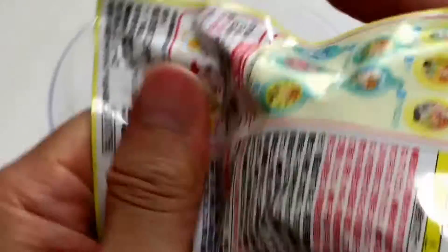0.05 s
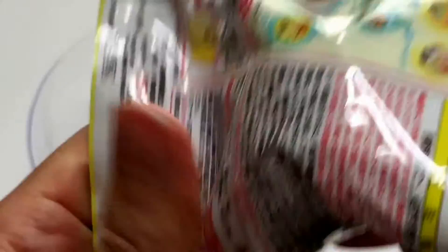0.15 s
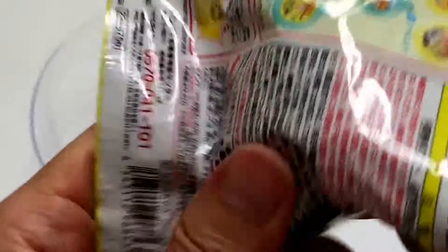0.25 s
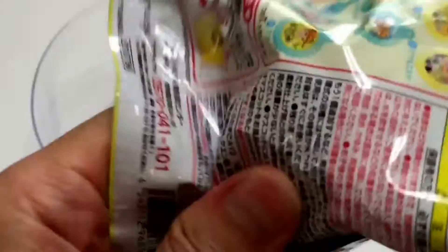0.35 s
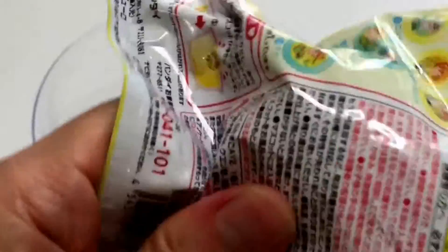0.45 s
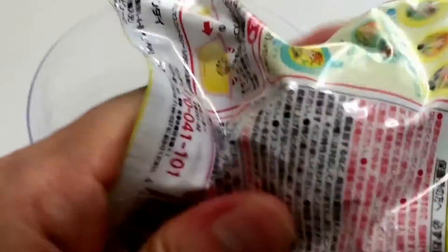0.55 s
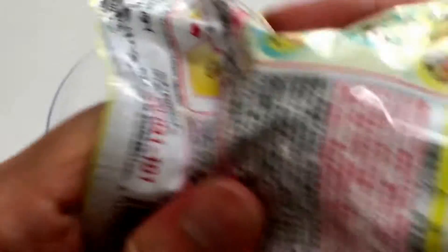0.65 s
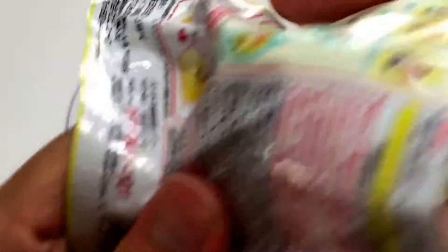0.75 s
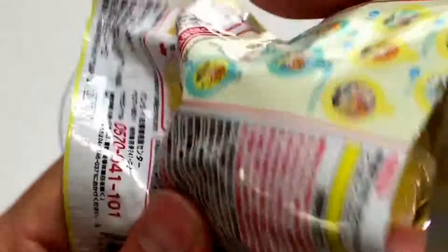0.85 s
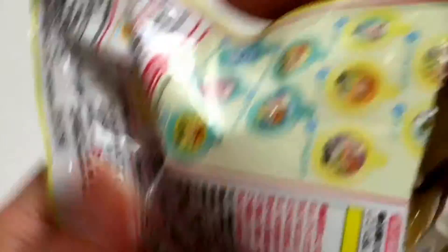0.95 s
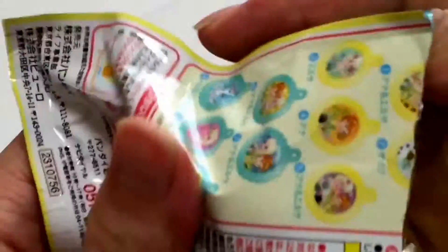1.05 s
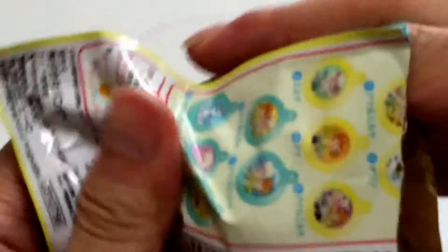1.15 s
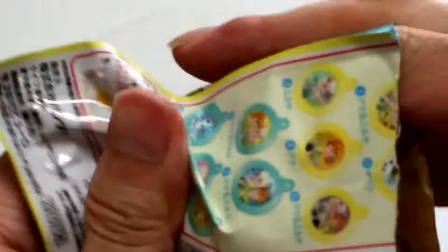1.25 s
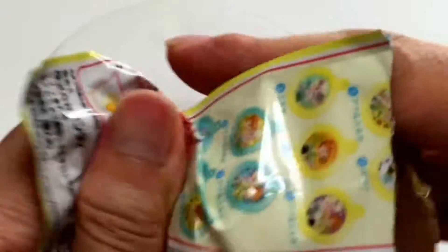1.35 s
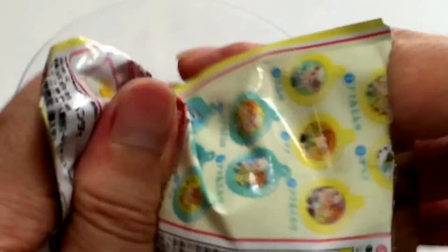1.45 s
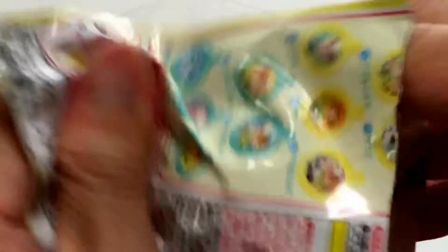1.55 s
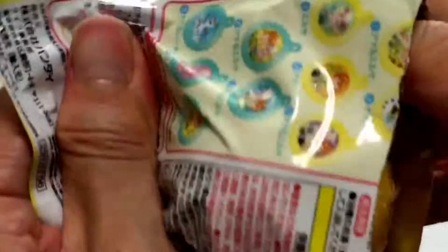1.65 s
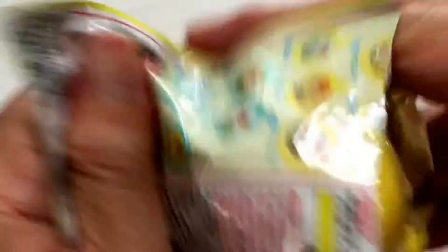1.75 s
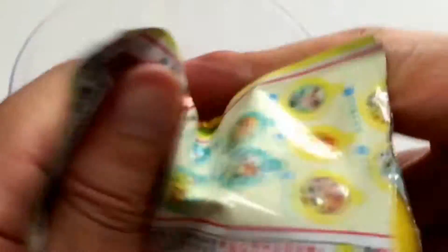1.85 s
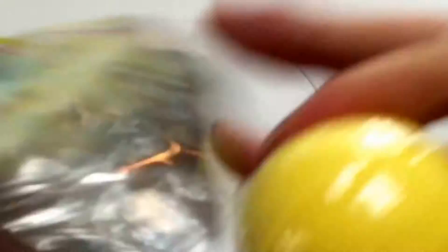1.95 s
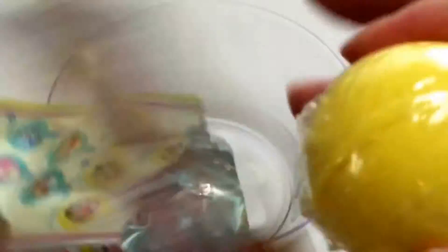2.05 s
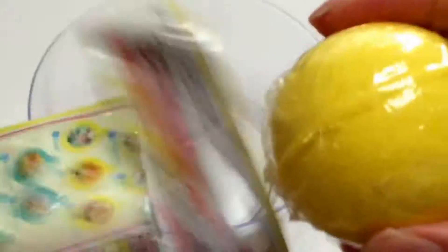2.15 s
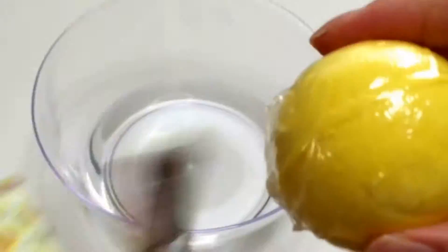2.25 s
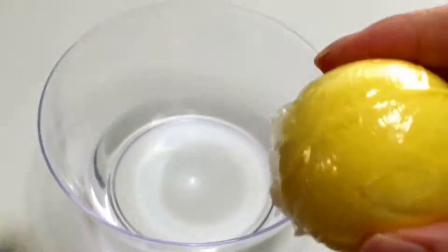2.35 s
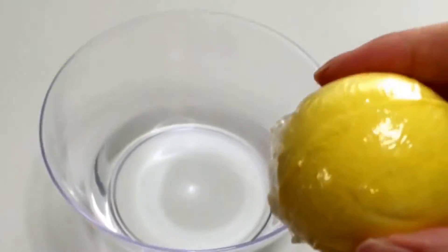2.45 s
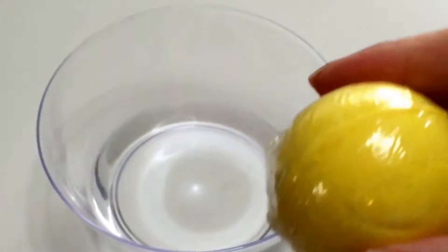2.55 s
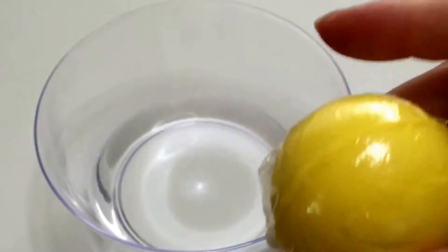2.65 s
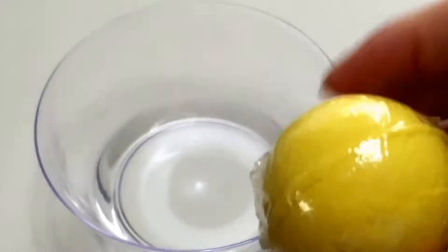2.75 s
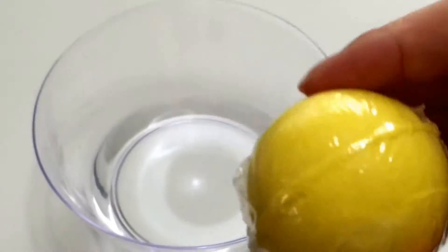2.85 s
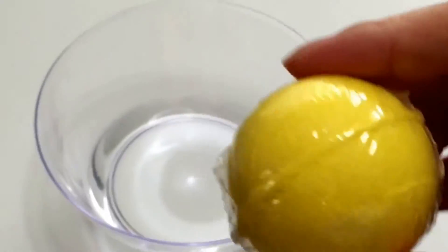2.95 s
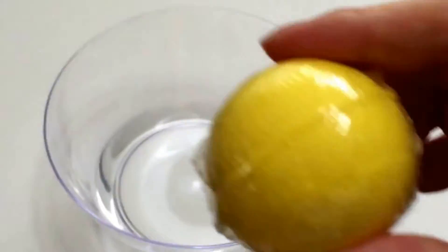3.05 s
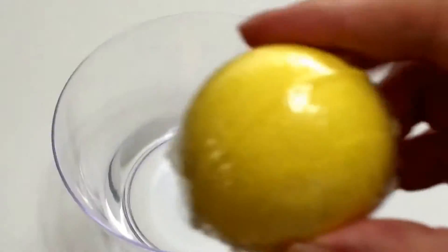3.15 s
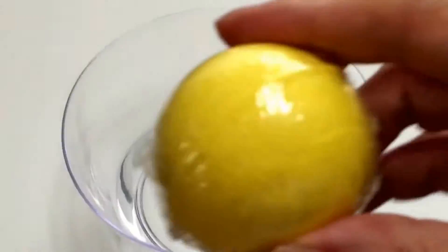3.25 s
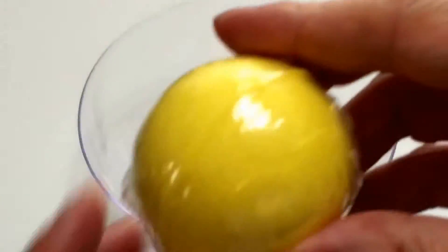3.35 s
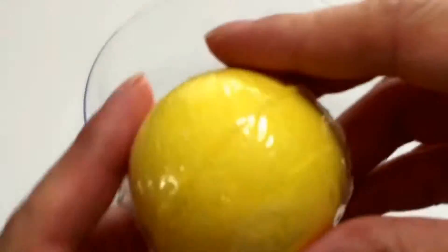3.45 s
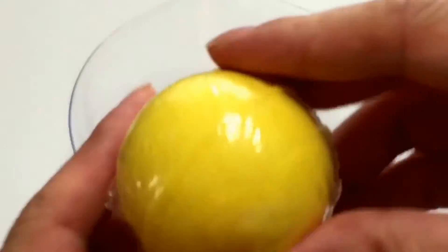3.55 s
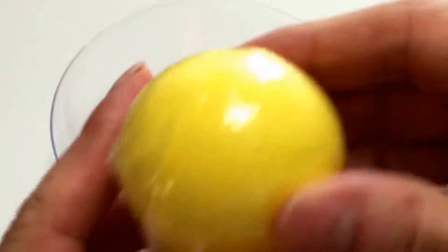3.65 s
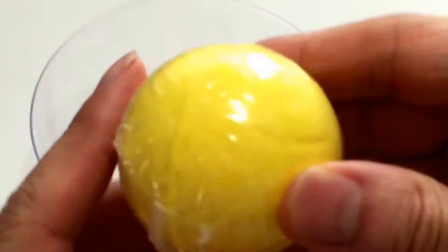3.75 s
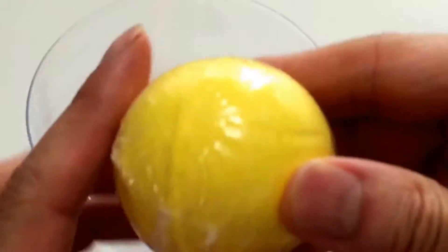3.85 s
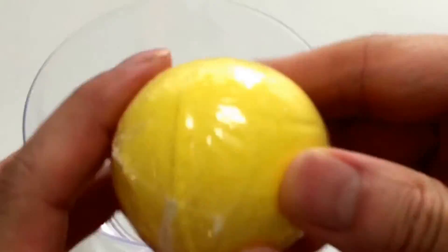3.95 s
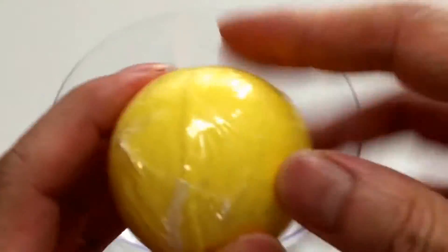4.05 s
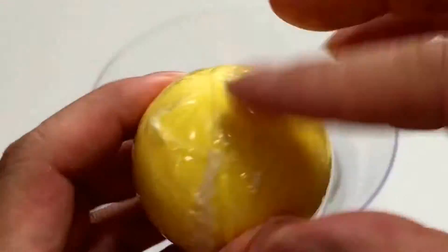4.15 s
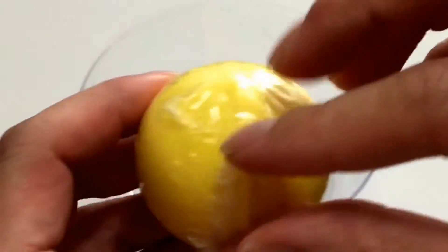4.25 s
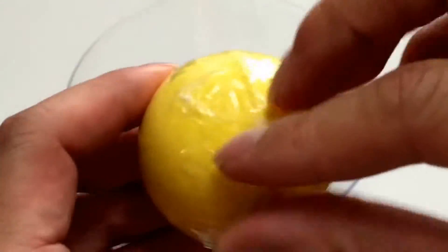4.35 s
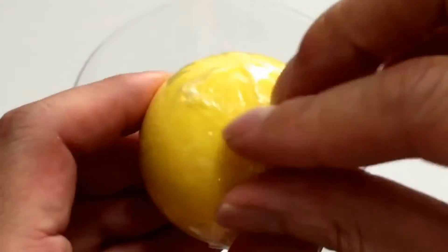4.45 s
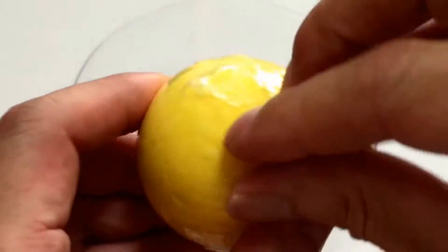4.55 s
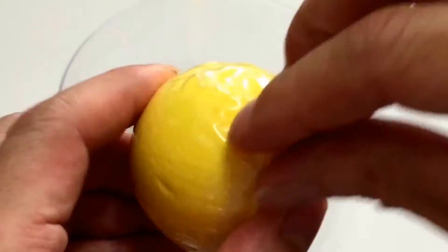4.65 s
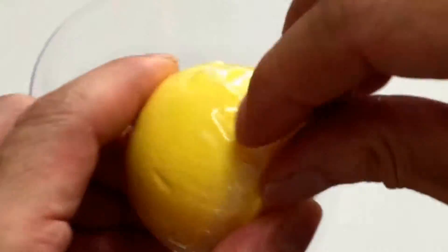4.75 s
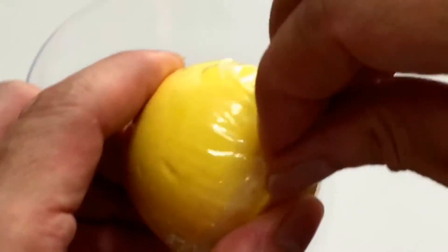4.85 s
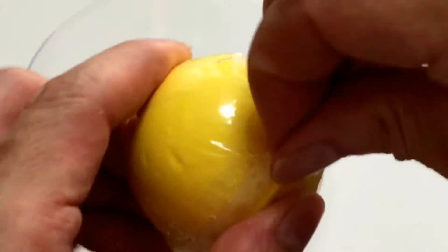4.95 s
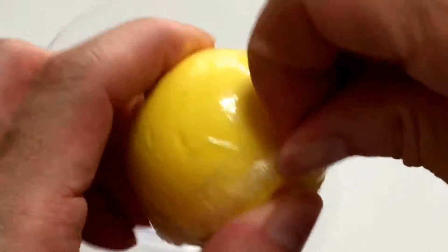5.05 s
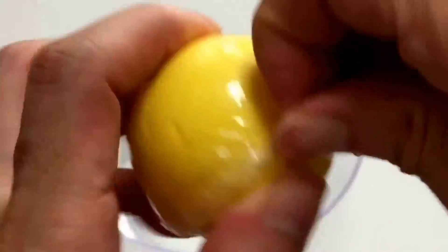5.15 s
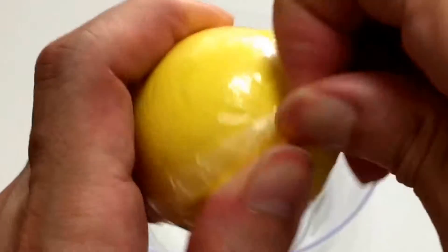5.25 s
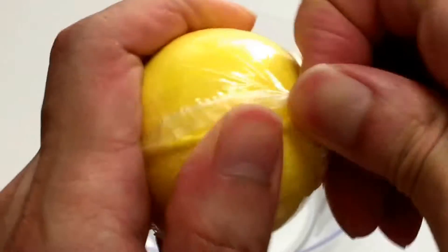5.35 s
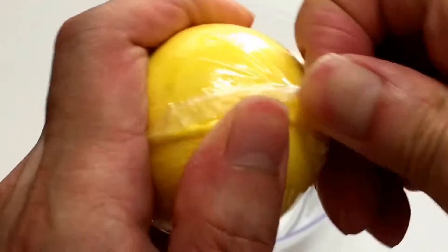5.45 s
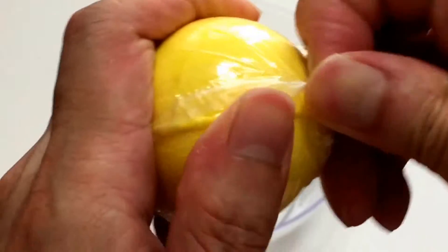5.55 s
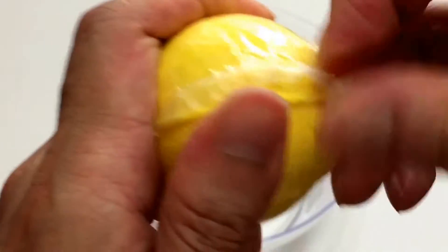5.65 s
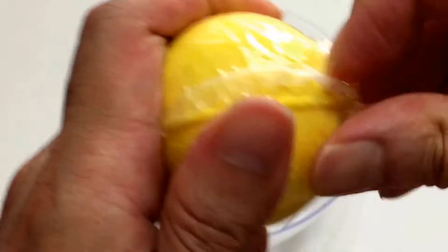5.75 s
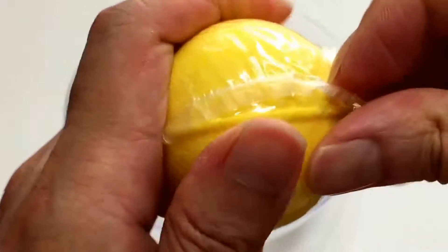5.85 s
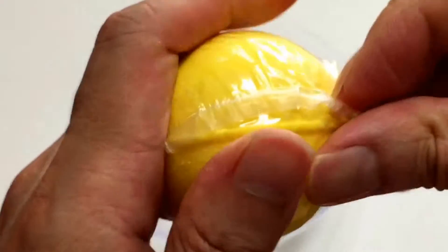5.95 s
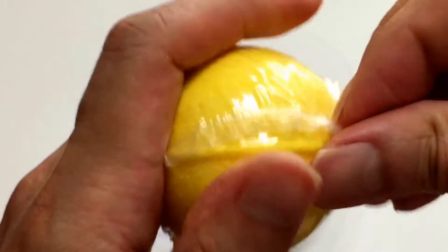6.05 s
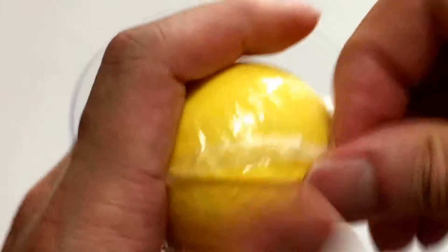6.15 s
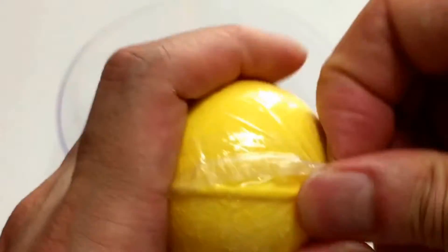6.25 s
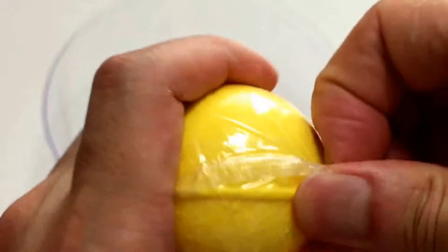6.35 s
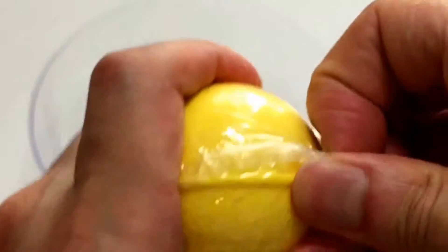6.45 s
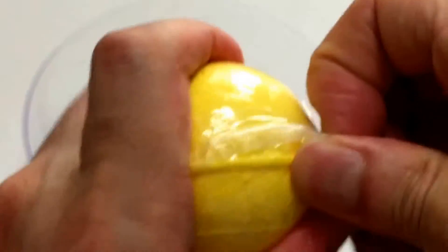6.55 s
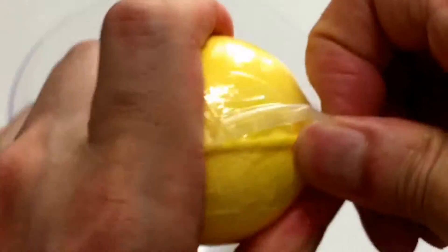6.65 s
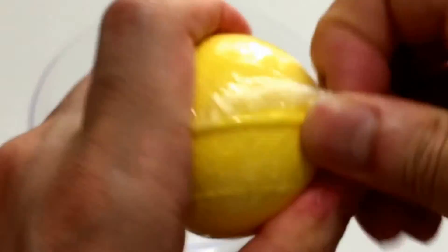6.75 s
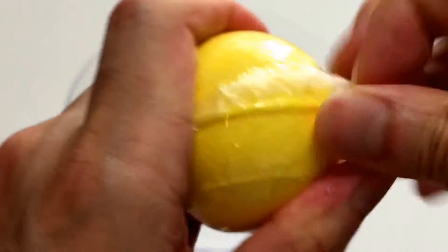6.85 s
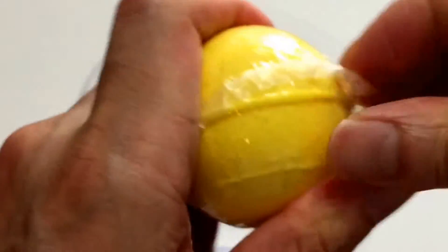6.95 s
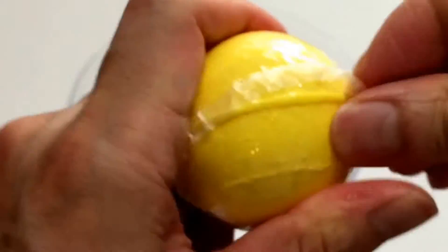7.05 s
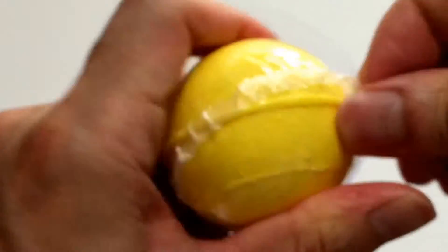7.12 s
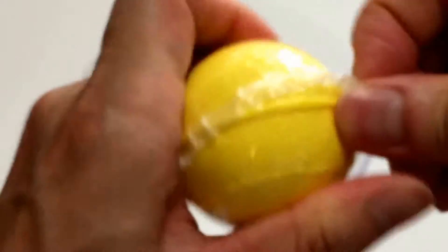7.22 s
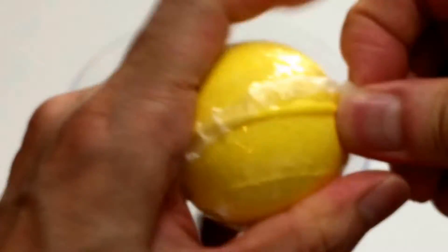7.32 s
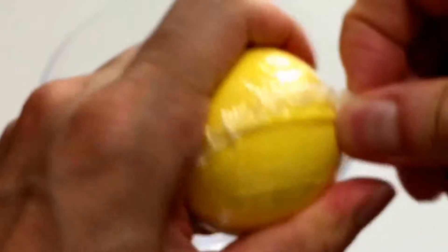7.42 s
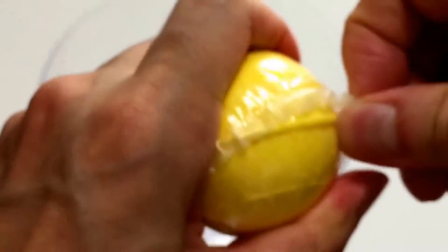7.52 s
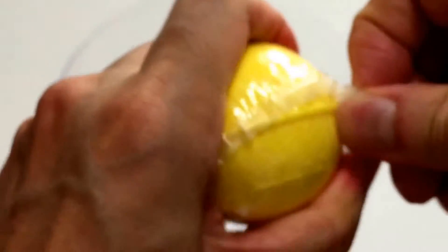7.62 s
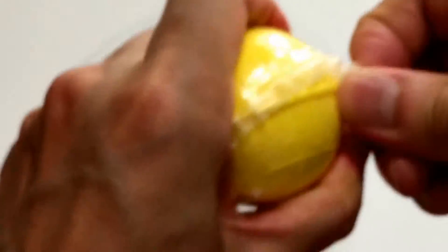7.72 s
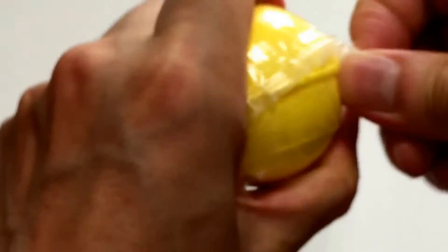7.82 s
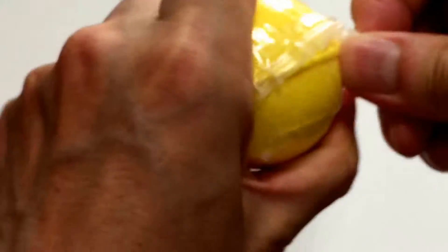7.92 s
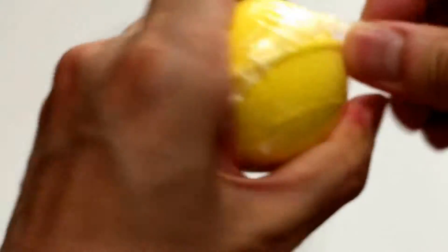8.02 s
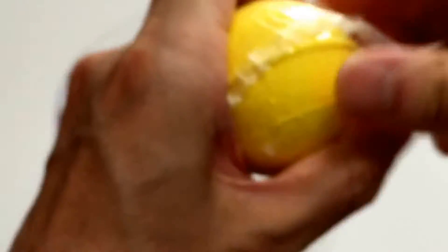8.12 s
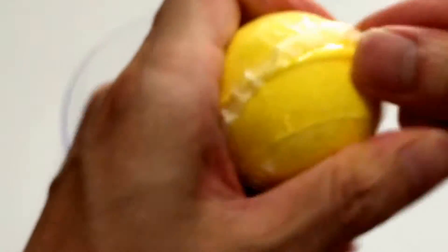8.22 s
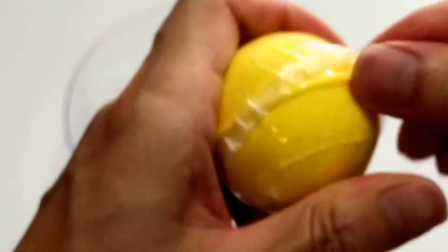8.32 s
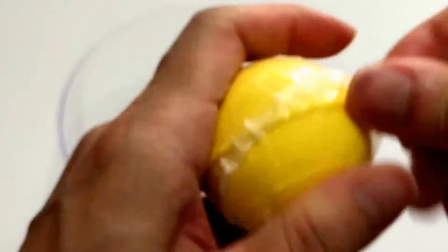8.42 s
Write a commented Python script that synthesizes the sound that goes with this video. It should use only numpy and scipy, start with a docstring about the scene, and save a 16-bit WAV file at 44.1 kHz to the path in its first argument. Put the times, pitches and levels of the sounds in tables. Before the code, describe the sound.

From the very start a stiff foil bag crackles close to the microphone: hard, dry, bright snaps, many per second, over fine crinkling and sliding film. Squeezes come in uneven bursts, with slightly more spaced snaps around 1.0 to 1.3 seconds, then a strong build, loudest from 1.6 to 2.0 as the bag is pulled off a ball, with a few dull soft bumps. Rustling thins after 2.3 and nearly stops by 2.7. Until 4.3 there is mostly steady airy hiss and a deep wavering hum, with a small tick near 3.3 and a clearer one near 3.7. Crisp ticks at 4.6 and 4.9 begin gentle picking at thin film. Light crinkles and fizzy little clicks grow busier from 6.3 to 7.1, then stay sparse and delicate to 8.5, while a somewhat higher low hum swells around 7.4. Short small-room reflections.

```python
"""Unwrapping a toy ball

Hands pull a toy ball out of a stiff foil bag, then pick more gently at the thin shrink film round the ball.
Creases buckle in single snaps, each ringing a small facet of the sheet, made from short damped swings.
Under them lie finer crinkles and sliding film, made from random clicks and noise in narrow bands.
All is close to the microphone in a small room, with a wavering hum of sine tones and a steady noise hiss."""
import sys
import numpy as np
from scipy import signal
from scipy.fft import rfft, irfft
from scipy.io import wavfile
from scipy.ndimage import uniform_filter1d

SR = 44100
rng = np.random.default_rng(int(sys.argv[2]) if len(sys.argv) > 2 else 0)


def file_out(sig):
    """Save sig as 16-bit WAV at sys.argv[1]."""
    # one column per channel
    cols = np.atleast_2d(sig).T
    # limit, then scale
    lim = np.clip(cols, -1, 1)
    pcm = np.round(lim * 32767).astype(np.int16)
    wavfile.write(sys.argv[1], SR, pcm)


N = 373968
CUTOFF_HZ = 15450   # top of the microphone's range, and the highest pitch of a facet or crack


def from_db(db):
    """Turn decibels into a gain."""
    return 10 ** (np.asarray(db) / 20)


def rms_one(x):
    """Scale a sound to an rms of 1."""
    return x / np.sqrt(np.mean(x ** 2) + 1e-20)


def in_time(rows):
    """Draw straight lines between the rows of a table, giving each column a value at every sample."""
    s, *columns = np.transpose(rows)
    return [np.interp(np.arange(N) / SR, s, column) for column in columns]


def at_hz(points, hz):
    """Read a spectrum in dB between its points, on a log-frequency axis."""
    point_hz, db = np.transpose(points)
    return np.interp(np.log(hz), np.log(point_hz), db)


def band(x, low_hz, high_hz, order=2):
    """Keep only the frequencies between two limits (Butterworth band-pass)."""
    edges_hz = [low_hz, min(high_hz, .47 * SR)]
    sos = signal.butter(order, edges_hz, "band", fs=SR, output="sos")
    return signal.sosfilt(sos, x)


def add(out, s, sound):
    """Mix a sound in at a time in seconds."""
    at = max(round(s * SR), 0)
    out[at:at + len(sound)] += sound[:max(N - at, 0)]


def twitch(hz, cycles):
    """A heavily damped swing: its envelope peaks after so many cycles, and it draws back the air it pushes."""
    # age is 1 where the envelope peaks
    age = np.arange(int(10 * cycles * SR / hz) + 2) * hz / (SR * cycles)
    turn = 2 * np.pi * cycles
    envelope = age * np.exp(1 - age)
    # this starting phase makes push and pull cancel
    return envelope * np.sin(turn * age - 2 * np.arctan(turn))


def tail(t60, delay_s, low_hz, high_hz):
    """Dense reflections of unit energy: noise that falls by 60 dB in t60 seconds, after a delay."""
    t = np.arange(int(t60 * SR) + 2) / SR
    dying = rng.standard_normal(len(t)) * from_db(-60 * t / t60)
    echoes = band(dying, low_hz, high_hz)
    return np.r_[np.zeros(int(delay_s * SR)), echoes / np.linalg.norm(echoes)]


def background(rms_db=-47.5, ripple_db=4.0, ripple_hz=50):
    """Steady air noise and hiss with narrow drones and whines; standing waves of the room ripple its spectrum."""
    # spectrum of the noise, relative: [f/Hz, level/dB per Hz]
    noise_colour = [(22, -36), (30, -5), (45, -12.5), (68, -8), (100, -1), (170, -4), (280, -12),
                    (500, -24), (850, -18), (1200, -16), (2200, -19), (3400, -26.5), (7000, -27),
                    (8600, -20.5), (10500, -42.5), (15000, -40)]
    # narrow drones and whines, and a dip where the rise is negative: [f/Hz, width/Hz, rise/dB]
    whines = [(44.6, 4, 17), (98.9, 6.1, 9), (2330, 11, 6), (4640, 30, -6), (5193, 25, 1), (5600, 18, 10)]
    hz = np.maximum(np.arange(N // 2 + 1) * SR / N, 1)
    knots_hz = np.arange(0, SR / 2, ripple_hz)
    ripple = ripple_db * np.interp(hz, knots_hz, rng.standard_normal(len(knots_hz)))
    db = at_hz(noise_colour, hz) + ripple * np.minimum(hz / 700, 1)   # weaker ripple in the bass
    for centre_hz, width_hz, rise_db in whines:
        db += rise_db / (1 + (2 * (hz - centre_hz) / width_hz) ** 2)
    noise = irfft(rfft(rng.standard_normal(N)) * from_db(db), N)
    return from_db(rms_db) * rms_one(noise)


def hum(deep_hz=56.1, upper_hz=148.4, waver=0.0032):
    """A deep tone with its octave fades while a higher tone swells; all waver in pitch together."""
    # rms levels of the tones: [t/s, deep level/dB, octave level/dB, upper level/dB]
    hum_levels = [(0.1, -59, -66, -60), (0.8, -56, -68, -64), (0.96, -49, -49.5, -64),
                  (1.82, -52.5, -59, -76), (2.12, -47, -48, -56), (2.53, -58, -59, -74),
                  (2.94, -48.5, -45.5, -66), (3.43, -54.5, -58, -56.5), (5.84, -73, -74, -48.5),
                  (7.41, -68, -70, -44.5), (8.25, -71, -75, -50.5)]
    wander = rms_one(uniform_filter1d(rng.standard_normal(N), size=8000))
    turn = 2 * np.pi * np.cumsum(1 + waver * wander) / SR   # phase of a 1 Hz tone
    pitches = [deep_hz, 2 * deep_hz, upper_hz]
    tones = [from_db(db) * np.sin(hz * turn) for hz, db in zip(pitches, in_time(hum_levels))]
    return np.sqrt(2) * sum(tones)


def rustle(attack_s=0.011, release_s=0.011, rest_flap_db=-0.5, rest_fizz_db=-15):
    """Levels of flapping, crinkle and fizz in dB: steady handling, and squeezes that build up, hold and relax."""
    # how hard the hands work the film between squeezes, first the bag, then the ball:
    # [t/s, crinkle level/dB]
    handling = [(0, -45), (.28, -45.5), (.52, -44), (.85, -45), (1.3, -46), (1.9, -43.5), (2.3, -47),
                (2.7, -56), (4.1, -67), (5.4, -60.5), (6.4, -53.5), (7.3, -56), (8.48, -54.5)]
    # squeezes and pulls, flap and fizz relative to the crinkle:
    # [start of hold t/s, hold/s, crinkle level/dB, flap level/dB, fizz level/dB]
    squeezes = [(0.053, .02, -31.5, -5, -27), (.125, 0.026, -41, -13, -3), (0.33, 0.025, -35.5, -19, -6),
                (0.418, 0.088, -36.5, -25, -14), (0.586, .03, -32, -15, -10), (0.673, 0.039, -35, -7, -8),
                (0.939, 0.11, -38.5, -3.5, -7), (1.143, 0.075, -41, -0.5, -15),
                (1.361, 0.032, -31, -8.5, -9), (1.205, .03, -44.5, 5, -14), (1.47, .04, -35, -21, -13),
                (1.606, 0.038, -35.5, -20, -8), (1.777, 0.032, -27.5, -13, -10),
                (1.804, 0.064, -30, -9.5, -7), (1.958, 0.044, -27, -7, -9), (2.004, 0.025, -32, 2.5, -5),
                (2.16, 0.043, -44, -4, -8), (2.221, 0.044, -33, -10.5, -8.5),
                (2.269, 0.036, -42.5, -10, -12), (2.425, 0.059, -49.5, -13, -4),
                (2.62, 0.047, -57.5, 6.5, -2), (4.319, 0.069, -56.5, -11, -10), (4.664, .07, -52, -22, -8),
                (5.385, .04, -56.5, -8, -1), (5.691, .04, -54.5, -12, 4), (5.88, 0.12, -56.5, -7, -11),
                (6.316, .03, -52, 1, -6), (6.392, 0.058, -50.5, -12, 1), (6.53, 0.054, -58, -15, 5),
                (6.622, 0.077, -55, -3, -4), (6.79, 0.16, -53.5, -19, 1.5), (7.09, 0.046, -52.5, -13, 1),
                (7.348, .02, -60.5, 0, 5.5), (7.709, 0.034, -62, 3, 11.5), (7.87, 0.027, -58.5, 5, 5.5),
                (7.961, 0.09, -62, -1, 10.5), (8.061, 0.054, -53.5, 4, -1), (8.244, .04, -56, 6, 2.5)]
    t = np.arange(N) / SR
    handling_db, = in_time(handling)
    # between squeezes the sheet flaps about as loudly as it crinkles and hardly fizzes
    power = from_db(handling_db + np.array([[rest_flap_db], [0], [rest_fizz_db]])) ** 2
    for start, hold, db, flap, fizz in squeezes:
        near = slice(*np.searchsorted(t, [start - attack_s, start + hold + 10 * release_s]))
        age = t[near] - start
        build_up = np.clip(1 + age / attack_s, 0, 1)
        relaxing = np.exp(-np.maximum(age - hold, 0) / release_s)
        gains = from_db([[db + flap], [db], [db + fizz]])
        power[:, near] += (gains * build_up * relaxing) ** 2
    return 10 * np.log10(power)


def crinkles(flap_db, crinkle_db, fizz_db, per_s=1400, size_spread_db=6.0, own_db=6.5, slide_db=-7.5,
             grain_db=-1.0, grip=0.14, patchy_db=3.0, patch_s=.02, scatter_s=.0008, count=21):
    """Swarms of tiny buckles, each shared unevenly among facets of all sizes, over the hiss of sliding film."""
    # colour of the fine crinkles: [f/Hz, level/dB]
    crinkle_colour = [(180, -13.5), (300, -12.5), (560, -12), (900, -5.5), (1400, -2.5), (2200, -4.5),
                      (3500, -5), (5500, 1.5), (9000, 0.5), (14000, 1)]
    t = np.arange(N) / SR
    at = np.flatnonzero(rng.random(N) < per_s / SR)
    sizes_db = size_spread_db * np.minimum(rng.exponential(1, len(at)), 4)
    # the lighter the handling, the larger the share of sliding hiss beside the buckling clicks
    buckling = from_db(grain_db + grip * np.minimum(crinkle_db + 33, 0))
    sliding = from_db(slide_db) * rng.standard_normal((2, N))   # neighbouring bands get unrelated noise
    knots = np.arange(0, t[-1] + patch_s, patch_s)
    half_band = 2 ** (1 / 5)
    out = np.zeros(N)
    for k, hz in enumerate(np.geomspace(180, 14000, count)):
        # bending waves reach each size of facet at a slightly different moment
        scatter = (scatter_s * SR * rng.random(len(at))).astype(int)
        arrival = np.minimum(at + scatter, N - 1)
        share_db = own_db * np.clip(rng.standard_normal(len(at)), -2, 2)
        clicks = np.zeros(N)
        clicks[arrival] = from_db(sizes_db + share_db) * rng.choice([-1, 1], len(at))
        drive = buckling * rms_one(clicks) + sliding[k % 2]
        # large facets flap, middling ones crinkle, the smallest fizz
        large = np.interp(np.log(hz), np.log([650, 1600]), [1, 0])
        small = np.interp(np.log(hz), np.log([2800, 6000]), [0, 1])
        level_db = large * flap_db + small * fizz_db + (1 - large - small) * crinkle_db
        # facets come and go as the sheet changes shape
        level_db = level_db + patchy_db * np.interp(t, knots, rng.standard_normal(len(knots)))
        gain = from_db(level_db + at_hz(crinkle_colour, hz)) * np.sqrt(SR / hz)   # evens out band power
        out += gain * band(drive, hz / half_band, hz * half_band)
    return out


def creases(crinkle_db, small_hz=2900, pitch_spread=0.42, cycles=0.19, crack_db=-10, push_db=-22,
            colour_db=4.5, typical_db=-18, thinning=0.39, count=200):
    """Rows of every snap: the big ones, the neighbours they take along, and small ones that follow the handling."""
    # big creases that snap; crack of the fold and push of the whole sheet are relative to the swing:
    # [t/s, facet swing level/dB, facet f/Hz, cycles to envelope peak, crack level/dB, push level/dB]
    big_snaps = [(0.0377, -4, 2110, 0.12, -11, -26), (0.0493, -20, 2100, 0.4, -24, 6),
                 (0.064, -4.5, 2250, 0.15, -15, -40), (0.0755, -1, 2410, 0.1, -17, -40),
                 (0.1138, -4, 3400, 0.4, 3, -40), (0.1199, -3, 2100, 0.19, -6, -15),
                 (0.1771, -1.5, 3570, 0.34, -14, -21), (0.267, -7.5, 2580, 0.14, -9, -21),
                 (0.3265, 1.5, 3900, 0.25, -7, -30), (0.3344, -3, 3420, 0.38, 0, -37),
                 (0.3458, -13, 1600, 0.3, -6, -19), (0.3673, -2, 4540, 0.57, 7, -21),
                 (0.4001, -10, 5880, 0.5, -7, -31), (0.415, 3.5, 3400, 0.21, -13, -21),
                 (0.4293, -1, 3640, 0.23, -5, -19), (0.4508, 1.5, 3400, 0.19, -8, -37),
                 (0.4624, -7.5, 2250, 0.18, -26, -10), (0.494, -14, 2430, 0.2, -15, -11),
                 (0.522, -3.5, 1490, 0.13, -10.5, -25), (0.5289, -6.5, 5120, 0.33, -4, -32),
                 (0.5639, -5.5, 1690, 0.14, -24, -9), (0.5826, -1.5, 2410, 0.12, -24, -24),
                 (0.6066, -2.5, 5120, 0.22, -22, -29.5), (0.6108, -14, 2910, 0.2, 3, -20),
                 (0.6544, -14, 2100, 0.14, -6, 2), (0.6584, -10, 4260, 0.52, 3.5, -24),
                 (0.668, -3.5, 2540, 0.53, 4, -10), (0.6963, -13.5, 1300, 0.18, -10, -9),
                 (0.709, -8, 5880, 0.37, -4, -27), (0.716, -6, 2760, 0.22, -13, -29),
                 (0.7438, -12, 3900, 0.23, -13, -34), (0.7526, -13, 1300, 0.14, -24, -40),
                 (0.76, -17, 3900, 0.36, 5.5, -40), (0.8103, 3, 3400, 0.3, -7, -37),
                 (0.8178, -4, 2960, 0.09, -14, -32), (0.8497, -12.5, 2960, 0.3, -15, -26),
                 (0.8961, -16.5, 2100, 0.28, 7, -5), (0.9129, -4, 4800, 0.35, -7, -25),
                 (0.9349, -10, 3900, 0.18, -2, -22), (0.9406, -3.5, 4170, 0.16, -24, -40),
                 (0.953, 1.5, 1960, 0.12, -5.5, -16), (0.9999, -6, 3170, 0.21, -16, -40),
                 (1.1055, -9.5, 2230, 0.3, -9, -40), (1.1165, -6, 3400, 0.14, -24, -34),
                 (1.1469, -9, 2060, 0.3, -24, -40), (1.1535, -2, 2300, 0.23, -24, -9.5),
                 (1.1862, -12.5, 2250, 0.21, -7, -22), (1.224, -16, 2760, 0.23, -24, -15),
                 (1.2688, -15, 2800, 0.4, -31, -40), (1.3136, -3.5, 2580, 0.25, -10, -42),
                 (1.3539, -4, 2580, 0.19, -16, -8), (1.3648, -4.5, 1830, 0.21, 0, -38),
                 (1.3874, 0, 9100, 0.55, -24, -31), (1.4222, 0, 3620, 0.3, -10, -22),
                 (1.4363, -4, 4780, 0.3, -24, -40), (1.4716, 1, 4170, 0.13, -31, -24),
                 (1.4797, -10, 1830, 0.17, -11, -40), (1.525, 0, 3640, 0.13, -24, -30),
                 (1.5425, 3.5, 2250, 0.13, -6, -45), (1.5814, -7, 4500, 0.27, -13, -7.5),
                 (1.5987, 8, 2980, 0.12, -7, -17), (1.6138, -4, 5260, 0.55, 1, -39),
                 (1.6377, -6, 1490, 0.14, 2.5, -42), (1.6548, -8, 3400, 0.18, -27, -40),
                 (1.6745, -5.5, 1960, 0.14, -24, -44), (1.6904, -8.5, 2780, 0.32, -8, -40),
                 (1.722, -9, 3900, 0.24, -13, -27), (1.7557, -13.5, 5880, 0.43, -5, -40),
                 (1.769, -11, 6800, 0.76, 9.5, -22), (1.7789, -5.5, 1300, 0.16, -26, -6.5),
                 (1.7928, 8, 3420, 0.12, -9, -18), (1.8195, -13, 2580, 0.4, 0, 3),
                 (1.8272, -6, 3900, 0.4, -4, -40), (1.8554, 0.5, 2450, 0.19, -4, -40),
                 (1.861, -10.5, 6240, 0.69, -7, -7), (1.8854, 2, 1480, 0.13, -24, -40),
                 (1.8988, -3.5, 2410, 0.14, -0.5, -25), (1.9271, -14, 2760, 0.23, -8, -40),
                 (1.938, -1.5, 2050, 0.23, -16, -6.5), (1.9616, -2, 1960, 0.19, -10, -25),
                 (2.0108, -5, 2100, 0.14, -11, -32), (2.0322, -0.5, 4100, 0.49, -7, -30),
                 (2.078, -4, 9300, 0.65, -26, -37), (2.0865, -6.5, 3400, 0.19, -4, -40),
                 (2.101, -11, 5120, 0.25, -12, -40), (2.1127, -10, 2410, 0.14, -24, -40),
                 (2.1385, -8.5, 1600, 0.12, -5, -40), (2.1723, -10.5, 3870, 0.28, -10, -22),
                 (2.2373, -5.5, 1940, 0.36, -16, -31), (2.2437, -8, 1830, 0.12, 0, -27),
                 (2.2657, 0.5, 4830, 0.21, -34, -27), (2.4082, -19.5, 1960, 0.14, -8, -37),
                 (2.4255, -12.5, 3400, 0.33, -1.5, -40), (2.4562, -16, 3400, 0.16, -20, -35),
                 (2.5737, -26.5, 2760, 0.23, -24, -18), (2.628, -24.5, 2410, 0.18, -21, -32),
                 (3.2771, -26.5, 4780, 0.25, -14, -28), (3.7424, -12.5, 9500, 0.13, -33, -42),
                 (4.6002, -8, 5000, 0.23, -4, -40), (4.6852, -22.5, 2410, 0.37, -12, -40),
                 (4.7244, -25, 2960, 0.35, -12, -40), (4.8801, -9.5, 1830, 0.16, -4.5, -48),
                 (5.1949, -26, 3660, 0.32, -4, -17), (5.3208, -23, 4870, 0.8, 8.5, -26),
                 (5.4183, -23, 3900, 0.19, -24, -27), (5.5328, -24.5, 1960, 0.13, 6, -40),
                 (5.7146, -18.5, 3670, 0.57, 6, -28), (5.883, -26, 3900, 0.95, -7, -10),
                 (6.1722, -23.5, 1960, 0.17, 3, -40), (6.322, -15, 1390, 0.13, -10, -40),
                 (6.4002, -16, 2580, 0.14, 8, -22), (6.4305, -11, 1600, 0.13, -5.5, -40),
                 (6.4472, -11, 9500, 0.18, -24, -40), (6.5283, -15, 4470, 0.75, -2.5, -40),
                 (6.5551, -13, 3400, 0.18, -3, -38), (6.5656, -17, 3400, 0.17, -10, -40),
                 (6.7584, -11.5, 2410, 0.12, -18, -45), (6.8084, -23, 4470, 0.4, 4, -40),
                 (6.8173, -13, 3200, 0.26, 2, -39), (6.8323, -18.5, 2580, 0.23, 10.5, -40),
                 (6.8517, -19.5, 2580, 0.23, 4, -29), (6.9331, -9.5, 6300, 0.2, -24, -34),
                 (6.9372, -18, 2440, 0.32, -1, -40), (6.9426, -23, 7730, 0.6, 1, -27),
                 (7.0971, -10.5, 4530, 0.18, 3, -40), (7.4794, -33, 7800, 0.47, 2, -15),
                 (7.5152, -15, 4170, 0.24, -4, -34), (7.522, -13.5, 5490, 0.2, -24, -40),
                 (7.6325, -23.5, 4270, 0.39, -21, -21), (7.714, -13.5, 5070, 1, 4, -40),
                 (7.7355, -24, 4780, 0.3, 2, -21), (7.976, -11.5, 6300, 0.12, -7, -40),
                 (8.048, -32, 3640, 0.88, -24, -22), (8.4555, -24.5, 5490, 0.55, -3, -9)]
    follow_s, follow_spread_s, follow_db = .003, .004, -14.5
    # small snaps: mean level above the crinkle, its spread, and a ceiling
    small_above_db, small_spread_db, small_top_db = 19, 3.5, -16.5
    big = np.array(big_snaps)
    small_s = rng.uniform(0, (N - 1) / SR, count)
    handled_db = crinkle_db[(small_s * SR).astype(int)]
    small_db = handled_db + small_above_db + small_spread_db * rng.standard_normal(count)
    pitch, crack, push, wait = rng.standard_normal((count + len(big), 4)).T
    # a weaker neighbour gives way mostly just after a big snap, now and then just before
    neighbour_s = big[:, 0] + follow_s + follow_spread_s * wait[count:]
    s = np.r_[small_s, neighbour_s]
    swing_db = np.r_[np.minimum(small_db, small_top_db), big[:, 1] + follow_db]
    hz = np.minimum(small_hz * np.exp(pitch_spread * pitch), CUTOFF_HZ)
    # a weak snap moves a small facet, so more of it is crack
    thin_db = thinning * (typical_db - swing_db)
    cracks_db = crack_db + thin_db + colour_db * crack
    pushes_db = push_db + colour_db * push
    return np.r_[big, np.c_[s, swing_db, hz, np.full(len(s), cycles), cracks_db, pushes_db]]


def snaps(rows, crack_db=-2.5, crack_cycles=1.0, push_db=-4.5, crack_hz=10500, push_hz=900,
          sheet_db=-9.5, sheet_t60=0.02, sheet_top_hz=10000, dispersion=0.62, order=4):
    """A crease flips: the fold cracks, its facet swings, and bending waves run on through the sheet."""
    out = np.zeros(N)
    detunes = rng.uniform(-0.26, 0.47, (len(rows), 2))
    # crack_db and push_db shift the levels of all the rows
    for (s, swing, hz, cycles, crack, push), (crack_tune, push_tune) in zip(rows, detunes):
        this_crack_hz = min(crack_hz * np.exp(crack_tune), CUTOFF_HZ)
        parts = [from_db(swing) * twitch(hz, cycles),
                 from_db(swing + crack + crack_db) * twitch(this_crack_hz, crack_cycles),
                 from_db(swing + push + push_db) * twitch(push_hz * np.exp(push_tune), 0.51)]
        # the sheet has a new shape at every snap
        sheet = from_db(sheet_db) * tail(sheet_t60, .0005, 630, sheet_top_hz)
        sheet[0] += 1   # the direct sound
        side = rng.choice([-1, 1])   # the fold flips inwards or outwards
        for part in parts:
            add(out, s, side * np.convolve(part, sheet))
    # high bending waves travel faster than low ones, so each snap is a tiny downward chirp
    for _ in range(order):
        out = signal.lfilter([-dispersion, 1], [1, -dispersion], out + 1e-18)
    return out


def bumps(cycles=0.61):
    """Dull pushes of air as the bag and ball shift in the hands."""
    # soft bumps of hands and bag: [t/s, swing level/dB, f/Hz]
    soft_bumps = [(0.57, -35, 250), (0.656, -26, 759.3), (0.697, -23, 706), (1.001, -36, 198),
                  (1.043, -30.5, 345), (1.779, -21.5, 350), (1.937, -40, 300), (2.028, -25, 203),
                  (2.137, -28.5, 342.4), (2.157, -33, 179), (8.363, -29, 65)]
    out = np.zeros(N)
    for s, db, hz in soft_bumps:
        add(out, s, from_db(db) * twitch(hz, cycles))
    return out


def room(x, table_db=-23.0, table_s=.0024, dull_db=-18.5, dull_t60=0.21, bright_db=-20.0, bright_t60=0.31):
    """The table top throws back one quick echo; the walls answer with a dull tail and a longer bright one."""
    table = from_db(table_db) * np.r_[np.zeros(int(table_s * SR)), x][:N]
    dull = from_db(dull_db) * signal.fftconvolve(x, tail(dull_t60, .005, 135.0, 5200))[:N]
    bright = from_db(bright_db) * signal.fftconvolve(x, tail(bright_t60, .006, 4100, 14300))[:N]
    return x + table + dull + bright


def scene():
    """The wrapper in the room, over the background and hum."""
    flap_db, crinkle_db, fizz_db = rustle()
    fine = crinkles(flap_db, crinkle_db, fizz_db)
    wrapper = fine + snaps(creases(crinkle_db)) + bumps()
    return (room(wrapper) + background() + hum())[None]


def record(dry):
    """The microphone colours the treble, peaks stop at full scale, the top is cut."""
    # bumps and dips of the microphone's response: [f/Hz, width/Hz, level/dB]
    mic_colour = [(4910, 240, -4), (6820, 1900, 2), (8980, 1700, 2), (10330, 400, -11)]
    for hz, width_hz, db in mic_colour:
        b, a = signal.iirpeak(hz, hz / width_hz, fs=SR)
        dry = dry + (from_db(db) - 1) * signal.lfilter(b, a, dry)
    low_pass = signal.firwin(201, CUTOFF_HZ, fs=SR)[None]
    return signal.fftconvolve(np.clip(dry, -1, 1), low_pass, "same")


dry = scene()
out = record(dry)
file_out(out)
```